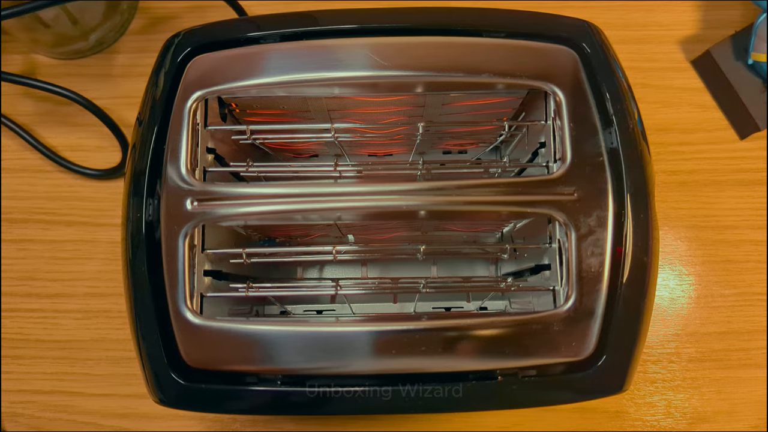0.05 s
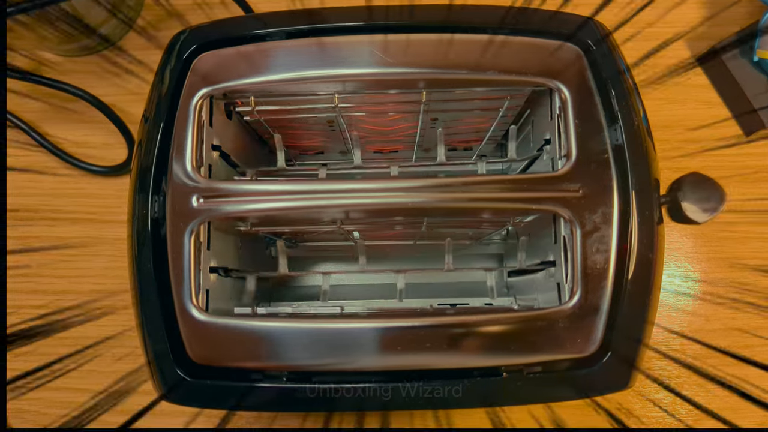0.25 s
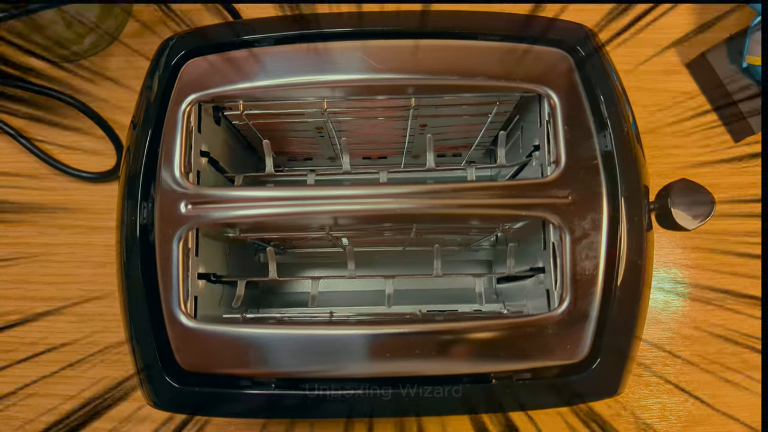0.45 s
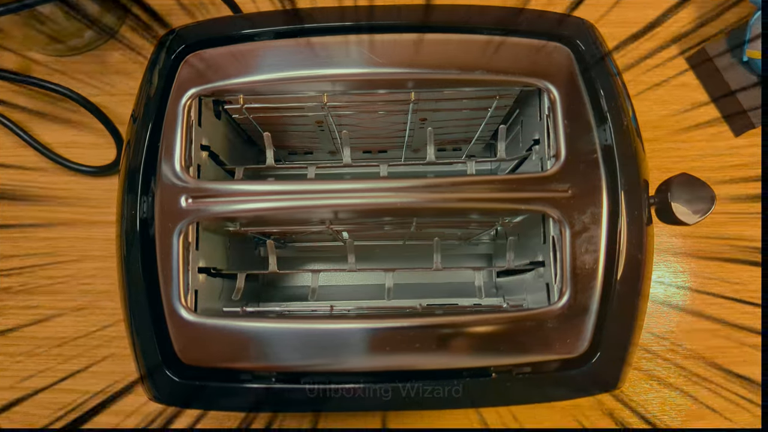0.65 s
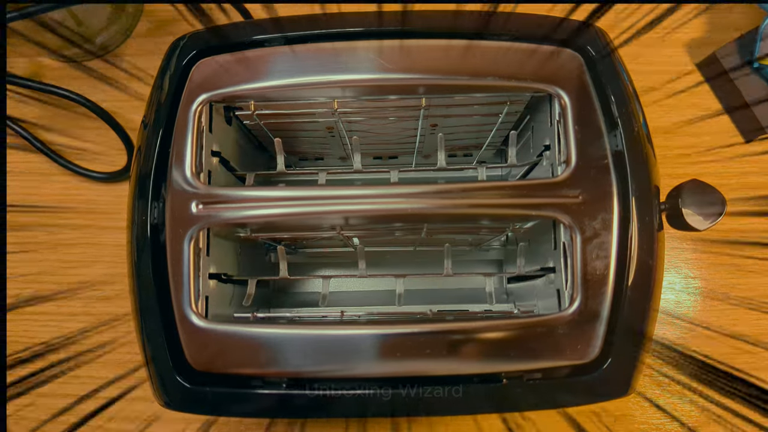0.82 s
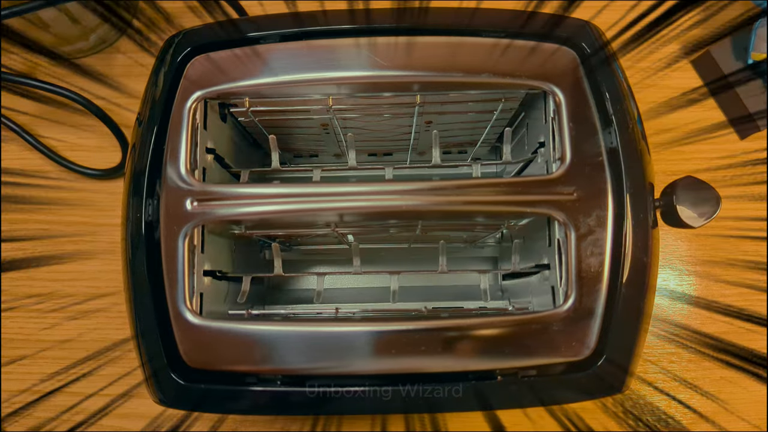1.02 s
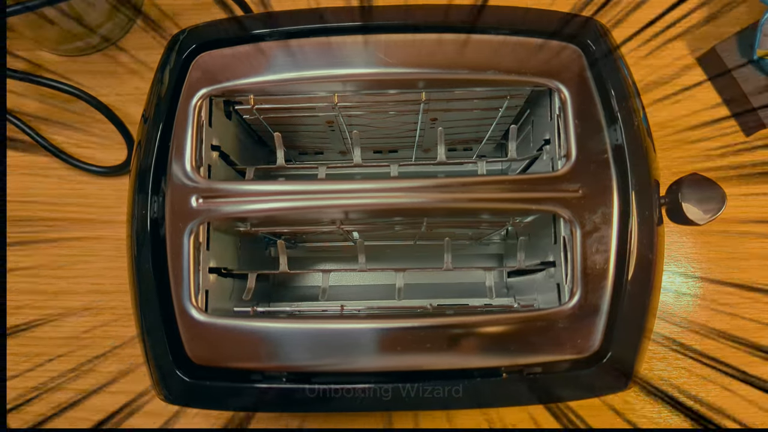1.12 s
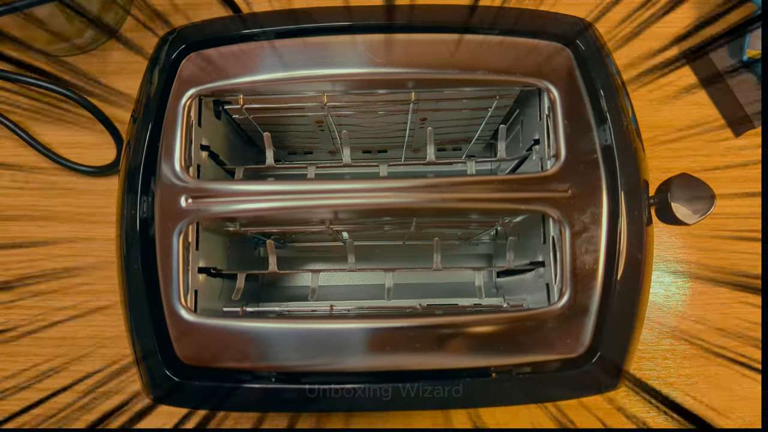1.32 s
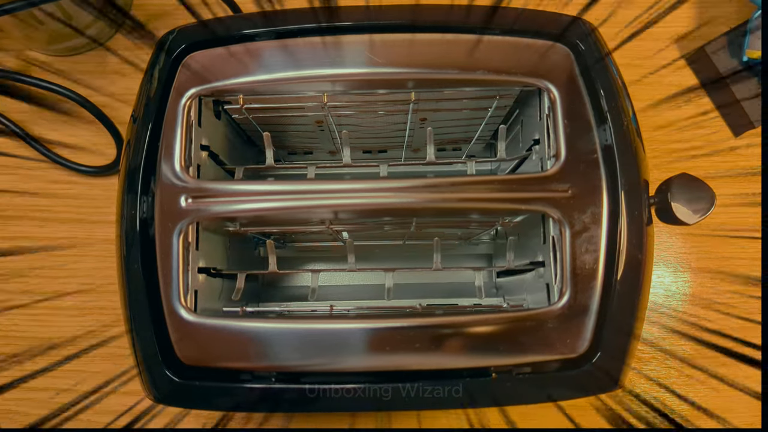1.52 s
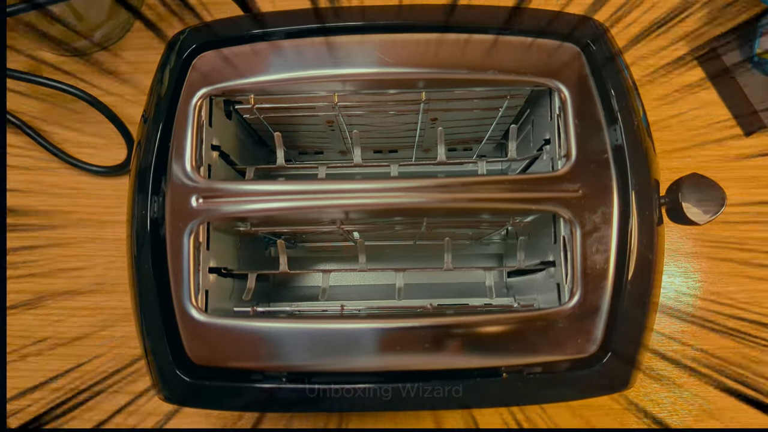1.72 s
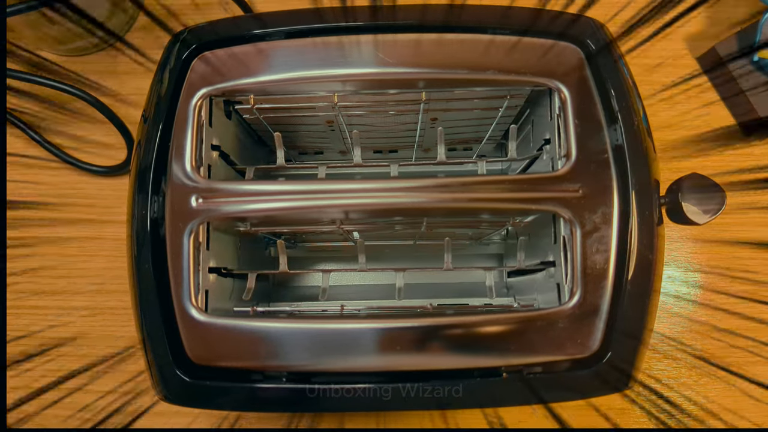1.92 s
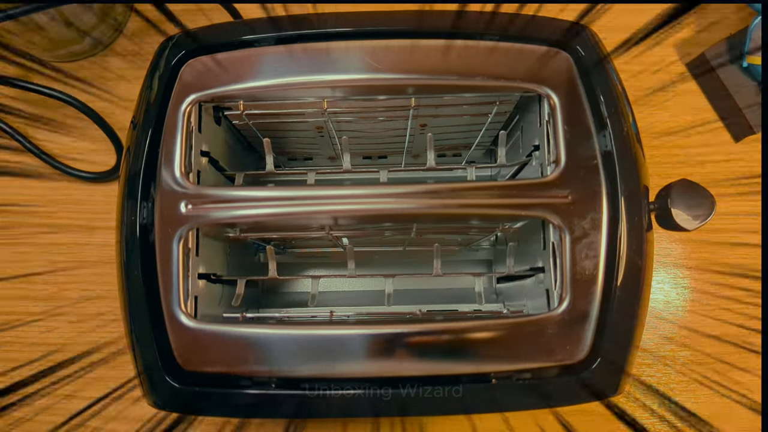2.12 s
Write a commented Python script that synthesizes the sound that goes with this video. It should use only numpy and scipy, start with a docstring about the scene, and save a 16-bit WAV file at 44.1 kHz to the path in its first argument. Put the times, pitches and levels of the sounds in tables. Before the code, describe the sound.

Close stereo of a toaster popping in a quiet kitchen. Soft air, faint low hum and thin buzzing whine on the left open it. At about 0.23 s the carriage springs up and slams: several hard metallic clacks until 0.38 s, dense wire clatter fading by 0.55 s, low table thumps. A weak low spring hum lingers to 2 s, with tiny rattles until about 1 s and a soft thud near 1.5 s.

```python
"""Stereo close-up of a toaster popping in a quiet kitchen. From the start: shaped-noise air, a thin tone
gliding at the mains half-cycle on the left, and the holding magnet's sine hum, which ends at release.
The carriage springs up and slams its stop: noise cracks and decaying modes, with a short noise room tail.
Wires and sheet metal clatter and settle (clustered ticks, short rings); the base thumps the table at low
frequency. The spring hums on as two sines while faint late rattles ring the wires."""
import sys
import numpy as np
from scipy import signal
from scipy.fft import rfft, irfft
from scipy.io import wavfile
from scipy.ndimage import uniform_filter1d

SR = 44100
rng = np.random.default_rng(int(sys.argv[2]) if len(sys.argv) > 2 else 0)


def volts_from_decibels(level):
    """Turn decibel levels (scalar or array-like) into linear amplitude factors."""
    exponent = np.asarray(level, float) / 20
    return 10 ** exponent


def bounce(signal):
    """Save signal as a 16-bit WAV file at the path given by the first command-line argument."""
    frames = np.transpose(np.atleast_2d(signal))
    limited = np.clip(frames, -1, 1)
    pcm = np.round(limited * 32767).astype(np.int16)
    wavfile.write(sys.argv[1], SR, pcm)


N = 94815


def evened(x):
    """Scales to rms 1."""
    return x / np.sqrt(np.mean(x ** 2) + 1e-20)


def smoothed(x, size):
    """Two running means in a row."""
    return uniform_filter1d(uniform_filter1d(x, size), size)


def read(points, hz):
    """Reads a spectrum table at these frequencies, linear in log frequency."""
    f, value = np.transpose(points)
    return np.interp(np.log(hz + 1), np.log(f + 1), value)


def track(rows, col=1):
    """Interpolates a control curve at every sample."""
    return np.interp(np.arange(N) / SR, [r[0] for r in rows], [r[col] for r in rows])


def add(mix, start_s, sound):
    """Mixes a sound in at a start time."""
    part = mix[..., round(start_s * SR):][..., :sound.shape[-1]]
    part += sound[..., :part.shape[-1]]


def colour(x, gain):
    """Filters by a gain per frequency."""
    return irfft(rfft(x) * gain, N)


def pair(a, b, alike, lean):
    """Two microphone ports: the right shares part of the left's signal, and the level leans to one side."""
    hz = np.fft.rfftfreq(N, 1 / SR)
    same = np.clip(read(alike, hz), 0, 1)
    tilt = volts_from_decibels(read(lean, hz) / 2)
    left = colour(a, tilt)
    right = colour(a, same / tilt) + colour(b, np.sqrt(1 - same ** 2) / tilt)
    return np.array([left, right])


def ring(hz, t60_s, phase):
    """One mode: a sine that rises in two cycles and decays exponentially."""
    t = np.arange(round(t60_s * SR)) / SR
    rise = np.minimum(t * hz / 2, 1)
    return rise * volts_from_decibels(-60 * t / t60_s) * np.sin(2 * np.pi * hz * t + phase)


# blows, ticks and faint low rings:
# (time [s], level [dB] before halving, struck part [Hz], ring over crack [dB])
STRIKES = [(0.2275, -38, 1820, 0), (.23, -46, 465, 17), (.2436, -20.5, 6350, 6.5), (0.263, -24, 3200, -2),
           (0.267, -20, 1900, 5), (0.2944, -15, 7960, -6), (.3012, -25.5, 510, 2.5),
           (.3085, -23.5, 498.5, 0.5), (0.3191, -20.5, 6630, -11.5), (.352, -36, 565, 6),
           (.378, -30.5, 529.3, -2), (0.445, -62, 455, 26), (0.5205, -62, 1540, 22)]
# modes of casing, racks and wires: (frequency [Hz], level [dB], t60 [s])
METAL_MODES = [(398, -10.5, .15), (473, -9, 0.27), (509, 0.5, 0.11), (555, -2, 0.26), (670, -18, 0.086),
               (1640, 3.5, 0.014), (1822, -10.5, 0.078), (2220, -4.5, 0.066), (3080, -1.5, 0.056),
               (5120, -12.5, 0.046), (6428, -3.5, 0.027), (7870, 3, .02), (8570, -4.5, .06),
               (11400, -6, .06), (12710, -6, .08)]
REACH_OCTAVES, CRACK_DECAY_S = 0.15, 0.0033


def blows():
    """Each row sounds a decaying noise crack plus the metal modes near the frequency of the struck part."""
    out = np.zeros((2, N))
    t = np.arange(600) / SR
    for start_s, db, spot_hz, ring_db in STRIKES:
        crack = np.exp(-t / CRACK_DECAY_S) * rng.standard_normal((2, 600))
        add(out, start_s, volts_from_decibels(db) * crack / 2)
        phases = rng.uniform(0, np.pi / 2, len(METAL_MODES))
        for (hz, mode_db, t60_s), phase in zip(METAL_MODES, phases):
            near = np.exp(-(np.log2(hz / spot_hz) / REACH_OCTAVES) ** 2)
            mode = ring(hz, t60_s, [[0], [phase]])  # phase differs between ports
            add(out, start_s, volts_from_decibels(db + ring_db + mode_db) * near * mode / 2)
    return out


ROOM_T60_S = 0.3536


def room(x):
    """Diffuse tail: convolution with decaying noise, independent per channel."""
    t = np.arange(SR // 2) / SR
    tail = rng.standard_normal((2, SR // 2)) * volts_from_decibels(-60 * t / ROOM_T60_S)
    return signal.fftconvolve(x, tail / np.linalg.norm(tail[0]), axes=1)[:, :N]


TICKS_PER_S, TICK_SPREAD_DB, SPREAD_LIMIT = 5000, 3, 3
PARTS, SNAP_DECAY_S, WIRE_T60_S, WIRE_DB = 24, 0.0012, 0.013, -3.5
CLUMP_DB, CLUMP_S = 3.5, 0.004


def loose_ticks():
    """Random clustered ticks shared among small parts; each part has its own noise snap and wire ring."""
    t = np.arange(1000) / SR
    spread = np.minimum(rng.exponential(1, (2, N)), SPREAD_LIMIT)
    size = volts_from_decibels(TICK_SPREAD_DB * spread) * (rng.random((2, N)) < TICKS_PER_S / SR)
    part = rng.integers(0, PARTS, (2, N))
    out = np.zeros((2, N))
    for k, hz in enumerate(np.geomspace(1200, 14000, PARTS)):
        drift = uniform_filter1d(rng.standard_normal(N), size=round(CLUMP_S * SR))
        clumps = volts_from_decibels(CLUMP_DB * evened(drift))
        snap = rng.standard_normal(1000) * np.exp(-t / SNAP_DECAY_S)
        wire = volts_from_decibels(WIRE_DB - 60 * t / WIRE_T60_S) * np.sin(2 * np.pi * hz * t)
        hits = size * clumps * (part == k)
        out += signal.oaconvolve(hits, (snap + wire)[None], axes=1)[:, :N]
    return out


# dense clatter: (time [s], high-band level [dB], low-band level [dB], middle-band level [dB])
CLATTER_LEVELS = [(.22, -56, -65, -66), (.231, -44.5, -49, -38.5), (.243, -26.5, -38.5, -38),
                  (.254, -30.5, -45, -35), (.266, -29, -37.5, -32.5), (.291, -30.5, -45, -39.5),
                  (.298, -34, -36, -40), (.33, -32.5, -43, -41), (.36, -39.5, -45, -45),
                  (.42, -47, -54, -56), (.56, -71, -86, -80.5)]
# clatter spectrum: (frequency [Hz], density [dB per Hz])
CLATTER_SPECTRUM = [(120, -18), (200, -10.5), (480, -4.5), (735, -11), (1870, -8.5), (3830, -13.5),
                    (8120, -7.5), (16000, -13.5)]
# late faint rattles: (time [s], level [dB], swell to peak [s])
LATE_RATTLES = [(.564, -57.5, 0.018), (.66, -79.5, 0.072), (0.825, -72, 0.015), (.982, -69.5, 0.015)]
LOW_HZ, HIGH_HZ = 900, 3500
SINGING_DB, TINKLE_DB = -16.5, 12  # mode peaks over the plain spectrum: clatter, late rattles


def clatter():
    """Loose metal: ticks in three bands with peaks at the metal modes, then late rattles with stronger peaks."""
    hz, t = np.fft.rfftfreq(N, 1 / SR), np.arange(N) / SR
    ticks = loose_ticks()
    peaks = sum(1 / (1 + ((hz - f) * t60_s / 3.0) ** 2) for f, _, t60_s in METAL_MODES)
    tone = volts_from_decibels(read(CLATTER_SPECTRUM, hz)) * (1 + volts_from_decibels(SINGING_DB) * peaks)
    low = 1 / (1 + (hz / LOW_HZ) ** 8)
    high = 1 / (1 + (HIGH_HZ / (hz + 1)) ** 8)
    bands = high, low * (hz > 130), 1 - low - high
    on = (t > CLATTER_LEVELS[0][0]) & (t < CLATTER_LEVELS[-1][0])
    out = np.zeros((2, N))
    for col, band in enumerate(bands, start=1):
        out += on * volts_from_decibels(track(CLATTER_LEVELS, col)) * evened(colour(ticks, tone * band))
    swell = np.zeros(N)
    for start_s, db, swell_s in LATE_RATTLES:
        u = np.maximum(t - start_s, 0) / swell_s
        swell += volts_from_decibels(db) * (u * np.exp(1 - u)) ** 2
    tinkle = evened(colour(ticks, high * (1 + volts_from_decibels(TINKLE_DB) * peaks)))
    return out + swell * tinkle


# base on table: (time [s], level [dB] before doubling, frequency [Hz], t60 [s])
BASE_KNOCKS = [(0.228, -42.5, 260, 0.089), (0.281, -34, 54, 0.17), (0.336, -36.5, 147.8, 0.11),
               (0.392, -44.5, 56.6, 0.12), (0.759, -58, 56.5, 0.33), (1.486, -47.5, 53.7, 0.24),
               (2.1, -59.5, 56, 0.76)]


def thumps():
    """The base thumps the table: low decaying modes, 2 dB louder on the left."""
    out = np.zeros(N)
    for start_s, db, hz, t60_s in BASE_KNOCKS:
        add(out, start_s, 2 * volts_from_decibels(db) * ring(hz, t60_s, 0))
    return out * volts_from_decibels([[1], [-1]])


# spring fundamental, rms before lean: (time [s], level [dB])
SPRING_LEVEL = [(.36, -55.5), (.46, -52), (.76, -52.5), (1.05, -58.5), (1.22, -71), (1.36, -65.5),
                (1.52, -65), (1.85, -71), (2.02, -84.5)]
SPRING_HZ, SPRING_OCTAVE_DB, SPRING_LEAN_DB = 177, -22, 3


def spring():
    """The lifting spring hums on: a sine and its octave under a slowly rising and falling level."""
    t = np.arange(N) / SR
    turn = 2 * np.pi * SPRING_HZ * t
    fade_in = np.clip((t - SPRING_LEVEL[0][0]) / 0.01, 0, 1)
    fade_out = np.clip((SPRING_LEVEL[-1][0] - t) / 0.032, 0, 1)
    tone = np.sin(turn) + volts_from_decibels(SPRING_OCTAVE_DB) * np.sin(2 * turn)
    hum = np.sqrt(2) * fade_in * fade_out * volts_from_decibels(track(SPRING_LEVEL)) * tone
    return hum * volts_from_decibels([[SPRING_LEAN_DB / 2], [-SPRING_LEAN_DB / 2]])


MAGNET_HZ, MAGNET_RMS_DB, MAGNET_FADE_IN_S, RELEASE_S = 93.4, -64.5, 0.11, 0.24


def magnet():
    """Mains hum of the holding magnet: a sine that fades in and stops at release."""
    t = np.arange(N) / SR
    on = np.clip(t / MAGNET_FADE_IN_S, 0, 1) * np.clip((RELEASE_S - t) / 0.02, 0, 1)
    return np.sqrt(2) * volts_from_decibels(MAGNET_RMS_DB) * on * np.sin(2 * np.pi * MAGNET_HZ * t)


# whine before doubling: (time [s], level [dB])
WHINE_LEVEL = [(0, -79), (.17, -72), (.72, -78.5), (.77, -67.5), (.92, -70.5), (1.08, -72), (1.15, -66.5),
               (1.27, -72.5), (1.41, -66.5), (1.51, -70.5), (1.7, -69.5), (1.87, -80), (1.99, -67),
               (2.06, -73), (2.12, -66.5)]
# whine centre pitch: (time [s], frequency [Hz])
WHINE_HZ = [(.2, 3184), (.5, 3234), (1.6, 3230), (1.9, 3221)]
MAINS_BEAT_HZ, THROB_PEAK_S, RISE_SHARE = 99.7, 0.772, 0.25  # share of the cycle spent rising
GLIDE_HZ, WANDER_HZ = 200, 5  # swing before smoothing; rms
THROB_DB, UNEVEN_DB = 3.5, 1.5  # louder at the top of the glide; random, rms
UPPER_RATIO, UPPER_DB, WHINE_LEAN_DB = 1.94, -16.5, 20


def whine():
    """Appliance tone leaping up and gliding down each mains half-cycle, with a fainter upper partial."""
    t = np.arange(N) / SR
    cycle = 2 * np.pi * MAINS_BEAT_HZ * (t - THROB_PEAK_S) + 2 * np.pi * RISE_SHARE
    saw = uniform_filter1d(signal.sawtooth(cycle, RISE_SHARE), size=60)
    wander = evened(smoothed(rng.standard_normal(N), 1500))
    uneven = evened(smoothed(rng.standard_normal(N), 300))
    turn = 2 * np.pi * np.cumsum(track(WHINE_HZ) + WANDER_HZ * wander) / SR
    glide = 2 * np.pi * np.cumsum(GLIDE_HZ * saw) / SR
    partials = np.sin(turn + glide) + volts_from_decibels(UPPER_DB) * np.sin(UPPER_RATIO * turn + glide)
    throbbing = evened(partials * volts_from_decibels(THROB_DB * saw + UNEVEN_DB * uneven))
    return 2 * throbbing * volts_from_decibels(track(WHINE_LEVEL)) * volts_from_decibels([[0], [-WHINE_LEAN_DB]])


# air spectrum, relative: (frequency [Hz], density [dB per Hz])
AIR_SPECTRUM = [(25, -14), (53, 7.5), (110, -6), (175, -5.5), (293, -17.5), (500, -18), (850, -23.5),
                (1350, -15.5), (2840, -18.5), (3250, -16), (3720, -22.5), (6380, -28), (9200, -30.5),
                (10000, -38), (16000, -44)]
# air, left over right: (frequency [Hz], level [dB])
AIR_SIDE = [(60, 0.0), (900, 3.5), (15000, -1.5)]
# air, left-right likeness, negative read as 0: (frequency [Hz], share [0-1])
AIR_LIKENESS = [(60, 0.73), (950, 0.067), (15000, -0.26)]
# boost around 1700 Hz: (time [s], level [dB])
MID_BOOST = [(0, -2.5), (.55, 7.5), (.7, 0.5), (.9, 5.5), (1.4, 2), (1.9, 0.5)]
# boost of the murmur around 400 Hz: (time [s], level [dB])
MURMUR_BOOST = [(.2, -0.5), (.55, 12.5), (.68, 11), (0.799, 17.5), (1.1, 3)]
AIR_RMS_DB, PATCH_RMS_DB = -64, 1.4  # before the lean; spectral drift
RUMBLE_HZ, RUMBLE_WIDTH_HZ, RUMBLE_RMS_DB = 56, 3.7, -70.5


def air():
    """Kitchen air: noise with drifting patches and a low murmur, over a lumpy narrow-band rumble."""
    frames, hz = N // 256 + 5, np.fft.rfftfreq(1024, 1 / SR)
    real, imag = rng.standard_normal((2, 2, 513, frames))
    patches = uniform_filter1d(rng.standard_normal((513, frames)), 10, axis=0)
    patches = evened(uniform_filter1d(patches, 16, axis=1))
    t = np.arange(frames) * 256 / SR
    mid = np.exp(-(np.log2((hz + 1) / 1700) / 2.5) ** 2)[:, None]
    murmur = np.exp(-(np.log2((hz + 1) / 400) / 0.57) ** 2)[:, None]
    db = read(AIR_SPECTRUM, hz)[:, None] + PATCH_RMS_DB * patches
    db = db + mid * np.interp(t, *np.transpose(MID_BOOST))
    db = db + murmur * np.interp(t, *np.transpose(MURMUR_BOOST))
    noise = signal.istft((real + 1j * imag) * volts_from_decibels(db), nperseg=1024, noverlap=768)[1][:, :N]
    fine_hz = np.fft.rfftfreq(N, 1 / SR)
    narrow = 1 / (1 + ((fine_hz - RUMBLE_HZ) / RUMBLE_WIDTH_HZ) ** 4)
    rumble = evened(colour(rng.standard_normal((2, N)), narrow))
    left, right = volts_from_decibels(AIR_RMS_DB) * evened(noise) + volts_from_decibels(RUMBLE_RMS_DB) * rumble
    return pair(left, right, AIR_LIKENESS, AIR_SIDE)


# blows and clatter, left over right: (frequency [Hz], level [dB])
METAL_SIDE = [(60, 1.2), (240, 0.83), (950, 5.7), (3770, 11), (15000, 2.5)]
# blows and clatter, left-right likeness: (frequency [Hz], share [0-1])
METAL_LIKENESS = [(60, 1), (950, 0.1), (15000, 0.031)]
ROOM_DB = -4.5


def scene():
    """The pop, with room tail on the blows, over the kitchen's background."""
    hits = pair(*blows(), METAL_LIKENESS, METAL_SIDE)
    pop = hits + volts_from_decibels(ROOM_DB) * room(hits)
    pop = pop + pair(*clatter(), METAL_LIKENESS, METAL_SIDE)
    return pop + thumps() + spring() + magnet() + whine() + air()


def low_pass(x):
    """Removes everything above the highest recorded frequency."""
    return signal.sosfilt(signal.butter(12, 16290, fs=SR, output="sos"), x)


LOW_CUT_HZ, EDGE_HZ = 20, 15950


def record(dry):
    """The microphone cuts the deepest bass; nothing passes above the top edge."""
    hz = np.fft.rfftfreq(N, 1 / SR)
    low_cut = 1 / (1 + (LOW_CUT_HZ / (hz + 1)) ** 4)
    mix = colour(dry, low_cut * (hz < EDGE_HZ))
    return low_pass(mix)


dry = scene()
out = record(dry)
bounce(out)
```